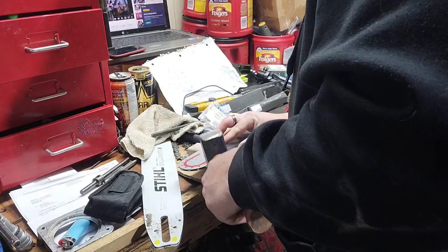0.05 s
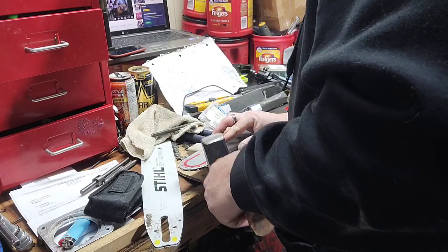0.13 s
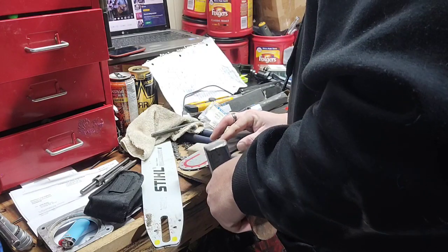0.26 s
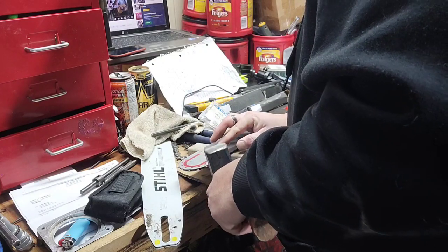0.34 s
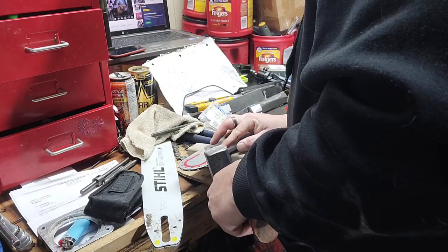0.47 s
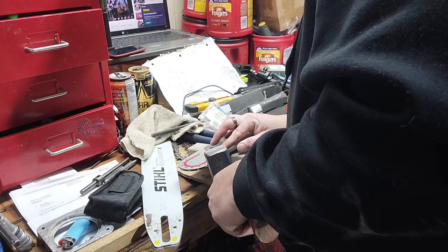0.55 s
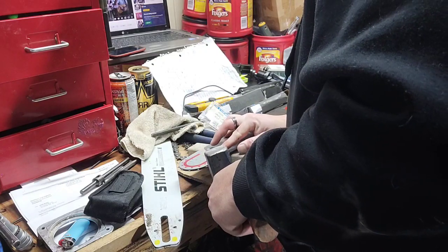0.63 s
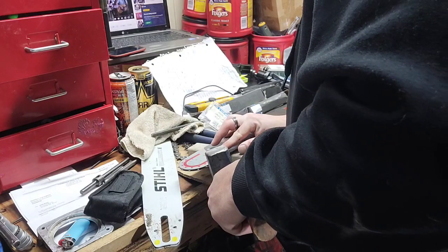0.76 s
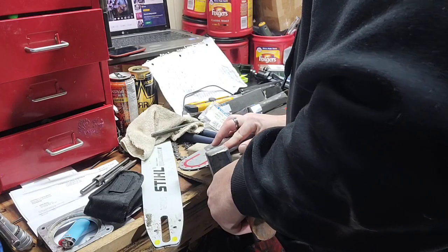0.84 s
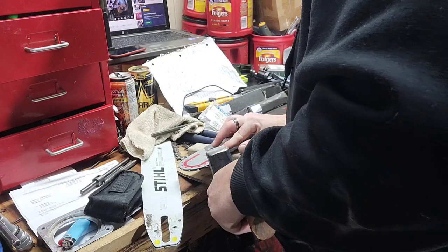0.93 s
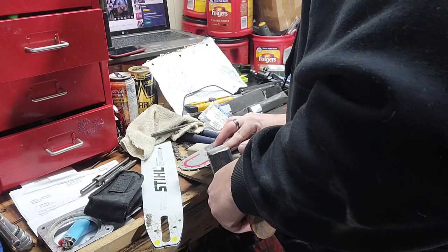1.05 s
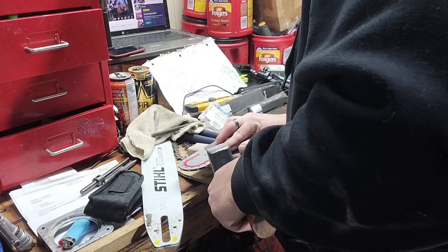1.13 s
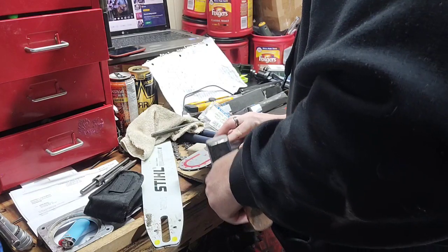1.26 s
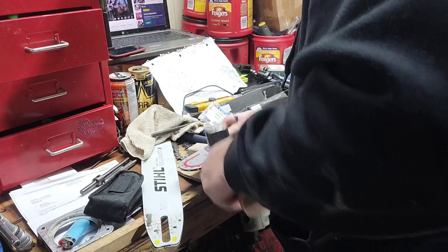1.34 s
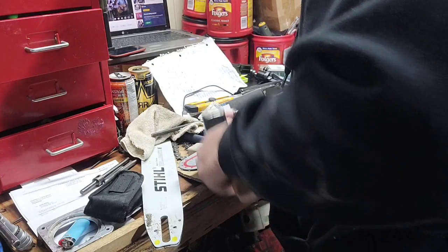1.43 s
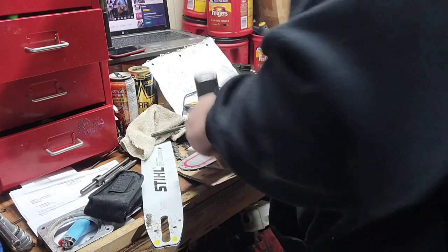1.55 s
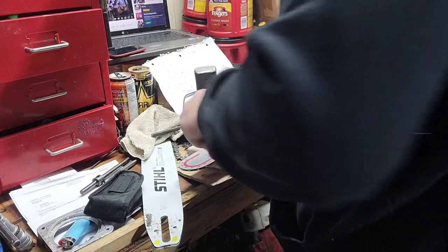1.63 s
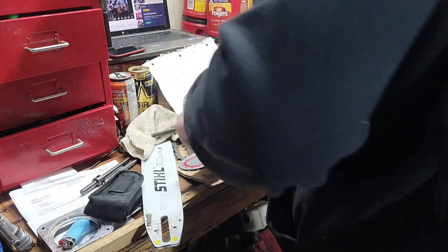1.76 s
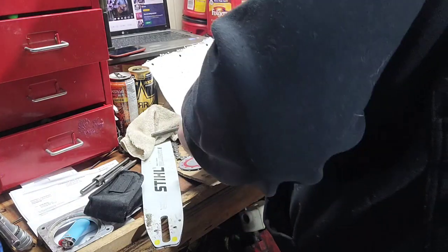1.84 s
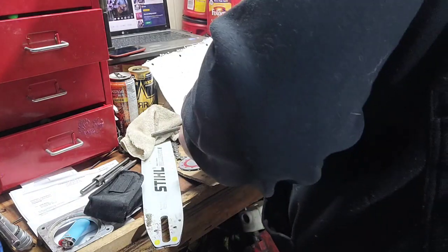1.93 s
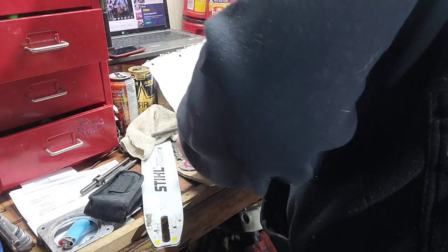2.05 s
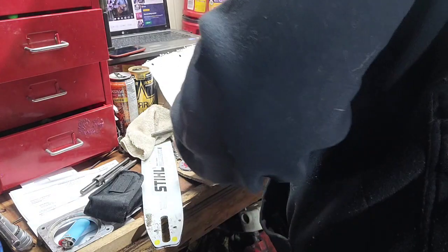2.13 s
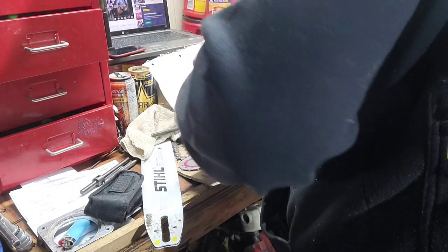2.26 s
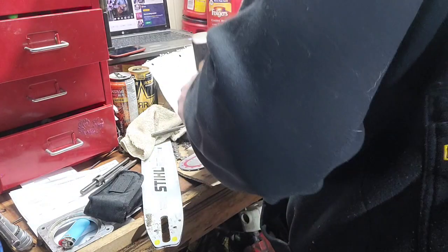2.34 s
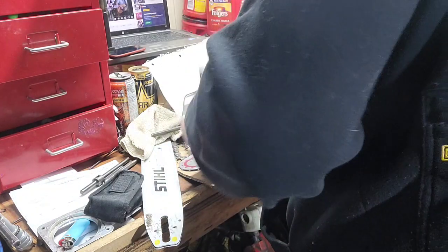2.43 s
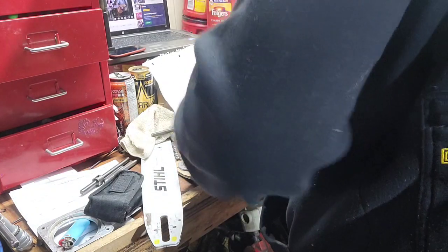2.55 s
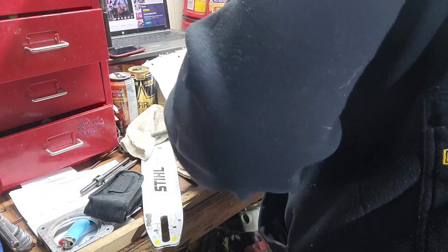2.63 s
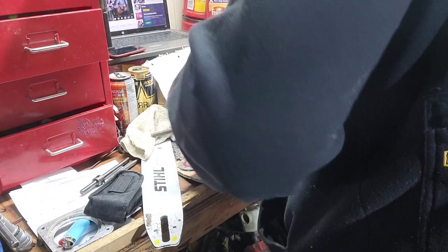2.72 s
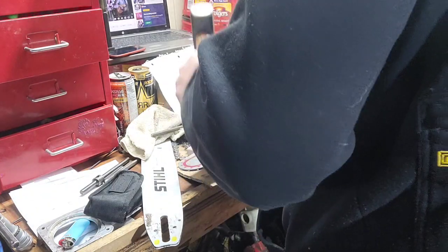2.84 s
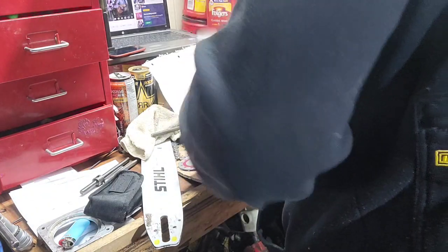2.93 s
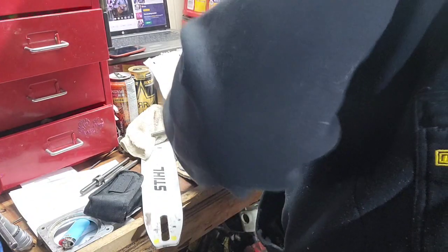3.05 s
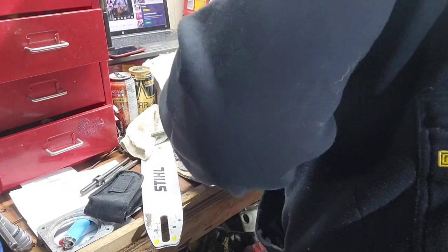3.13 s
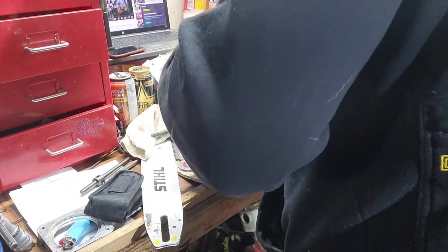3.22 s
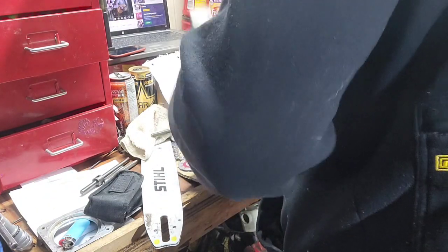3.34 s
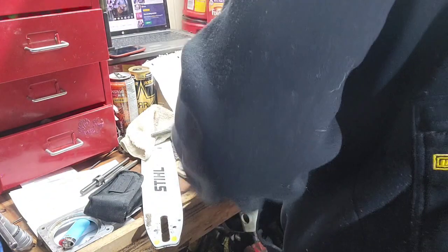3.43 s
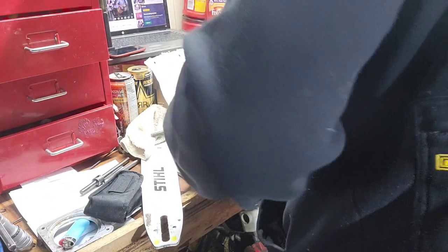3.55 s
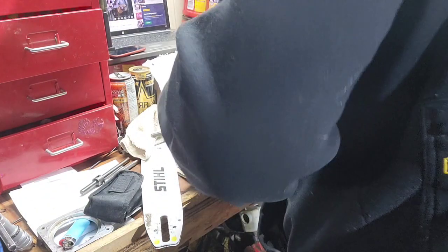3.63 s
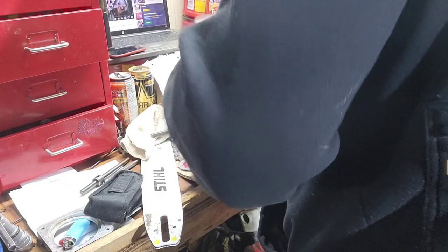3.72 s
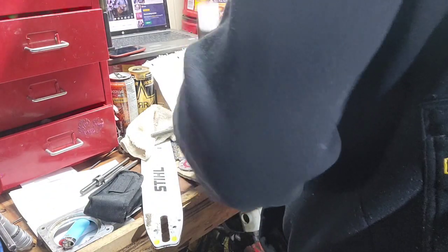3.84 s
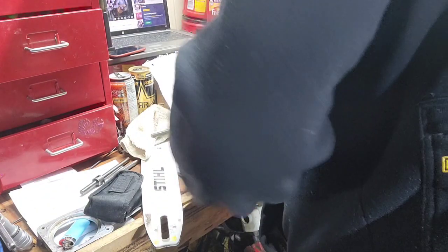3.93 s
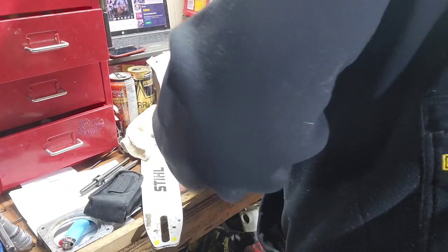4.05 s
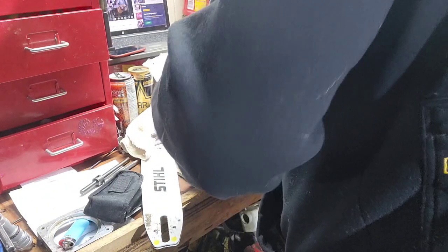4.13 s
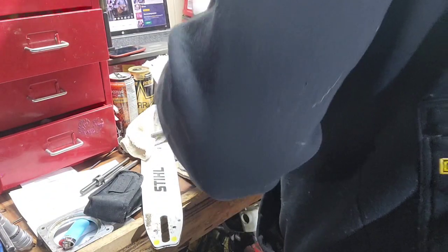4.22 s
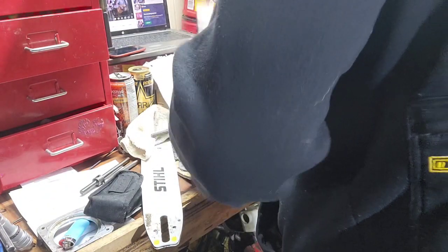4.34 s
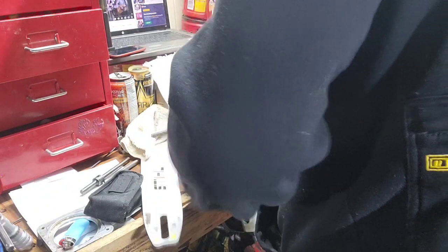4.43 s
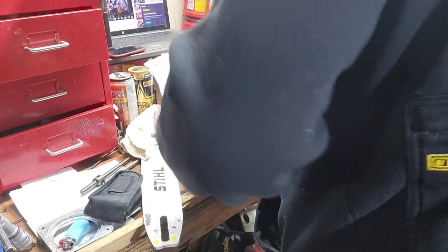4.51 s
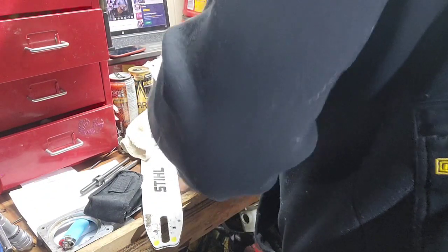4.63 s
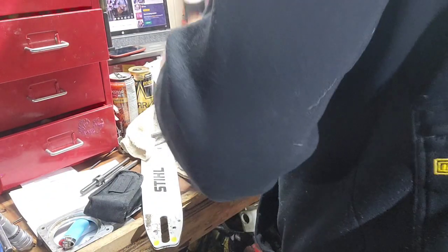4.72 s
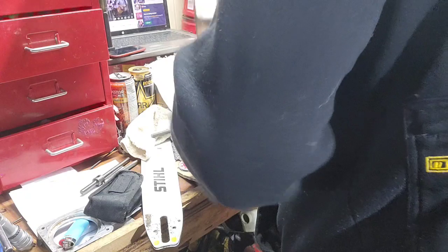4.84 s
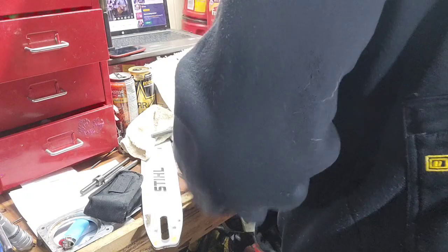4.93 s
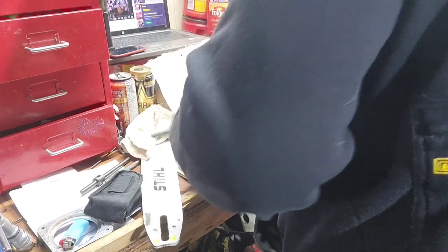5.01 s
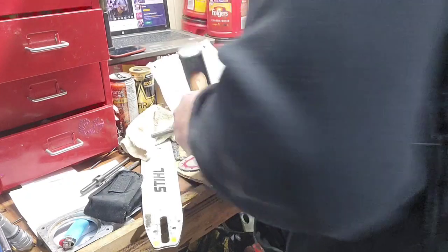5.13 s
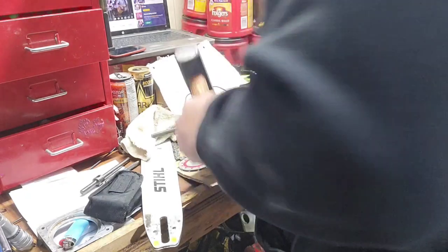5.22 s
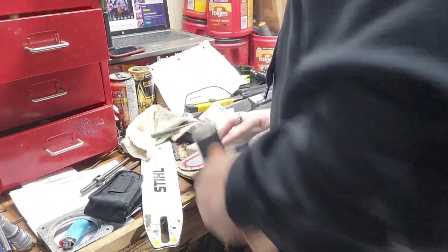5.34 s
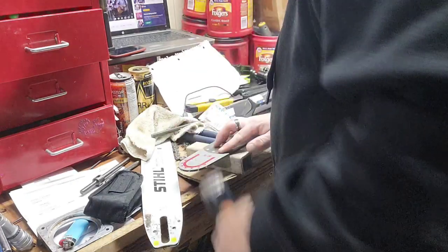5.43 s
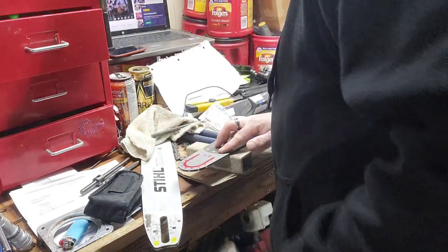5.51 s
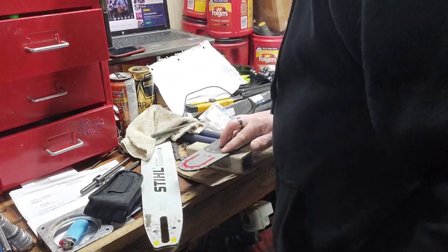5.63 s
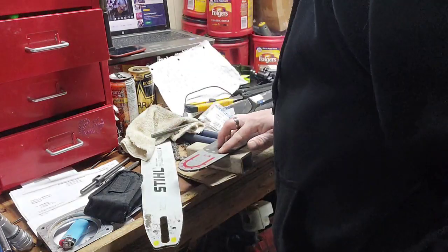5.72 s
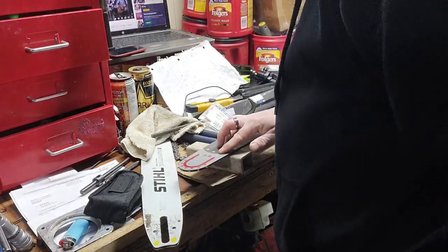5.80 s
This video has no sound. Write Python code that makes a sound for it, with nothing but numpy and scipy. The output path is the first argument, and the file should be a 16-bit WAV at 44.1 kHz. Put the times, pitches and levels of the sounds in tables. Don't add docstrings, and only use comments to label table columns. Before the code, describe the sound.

In a quiet shop with a faint fan hum, six hard hammer blows clang on steel, thumping a cluttered wooden bench and rattling loose parts.

```python
import sys
import numpy as np
from scipy import signal
from scipy.fft import rfft, irfft, next_fast_len
from scipy.io import wavfile
from scipy.ndimage import uniform_filter1d, map_coordinates

SR = 44100
rng = np.random.default_rng(int(sys.argv[2]) if len(sys.argv) > 2 else 0)


def linear_from_db(decibels):
    return 10 ** (np.asarray(decibels, float) / 20)


def generate_wav(sig):
    pcm = np.round(np.clip(np.atleast_2d(sig).T, -1, 1) * 32767).astype(np.int16)
    wavfile.write(sys.argv[1], SR, pcm)


N = 258862

# start in seconds, peak in dB, steel mode favoured by the spot struck in Hz,
# hammer head ring in dB, extra treble duck of the left port in dB.
BLOWS = [
    (2.5525, -7, 6530, -17, -2),
    (3.045, -5.5, 3930, -19.5, 30),
    (3.518, -7, 4560, 2, 3),
    (4.006, -6, 4720, -10, 26.5),
    (4.493, -5.5, 3740, -7.5, 22),
    (5.008, -4, 5100, 1.5, 16),
]


def unit(x):
    return x / np.sqrt(np.mean(x ** 2) + 1e-20)


def along(points, hz):
    f, v = np.transpose(points)
    return np.interp(np.log(hz + 1), np.log(f + 1), v)


def humps(peaks, hz):
    return sum(linear_from_db(db) * np.exp(-2 * ((hz - c) / w) ** 2) for c, w, db in peaks)


def wobble(knots_per_s):
    knots = rng.standard_normal(int(N * knots_per_s / SR) + 4)
    return map_coordinates(knots, [np.arange(N) * knots_per_s / SR])


def filtered(x, response):
    m = next_fast_len(N + SR // 2)
    return irfft(rfft(x, m) * response(np.fft.rfftfreq(m, 1 / SR)), m)[..., :N]


def dying(spectrum, t60s, patchy_db):
    hz, t, z = signal.stft(rng.standard_normal((2, SR // 2)), SR, nperseg=256)
    unevenness = uniform_filter1d(rng.standard_normal(z.shape[1:]), size=12, axis=1)
    patches = linear_from_db(patchy_db * unit(unevenness))
    colour = unit(linear_from_db(along(spectrum, hz)))[:, None]
    decay = linear_from_db(-60 * t / along(t60s, hz)[:, None])
    return signal.istft(z * colour * patches * decay, SR, nperseg=256)[1][:, :SR // 2]


def ringing(modes, scatter_db, rough):
    t = np.arange(SR // 2) / SR
    out = np.zeros((2, len(t)))
    for hz, db, t60_s in modes:
        level = linear_from_db(db + scatter_db * rng.standard_normal() - 60 * t / t60_s)
        drift = rough * np.cumsum(rng.standard_normal(len(t))) / np.sqrt(SR)
        phase = 2 * np.pi * (hz * t + rng.random()) + drift
        out += level * np.sin(phase + [[0], [np.pi / 2]])
    return out


def add(track, sound, s):
    start = round(s * SR)
    track[:, start:start + sound.shape[-1]] += sound


def ports(pair, alike, left):
    def mix(hz, sign):
        turn = np.arccos(np.clip(along(alike, hz), -1, 1)) / 2
        return linear_from_db(sign * along(left, hz) / 2) * np.array([np.cos(turn), sign * np.sin(turn)])
    return np.array([filtered(pair, lambda hz: mix(hz, sign)).sum(axis=0) for sign in (1, -1)])


def blows():
    # Hz, density in dB per Hz; then Hz, t60 in seconds.
    clang_spectrum = [(110, -27.5), (220, 0.5), (566, -6.5), (790, -4), (888, -3), (979, -14), (1390, -6.5),
                      (2870, -9.5), (3350, -8), (6140, -16.5), (8070, -13), (8730, -22.5), (16000, -15.5)]
    clang_t60 = [(200, 0.15), (700, 0.1), (1500, 0.11), (4000, 0.12), (12000, 0.1)]
    # Hz, level in dB.
    steel_modes = [(3292, -4), (3450, -2), (3822, -7), (4145, -6), (4470, -3), (5145, -6.5), (5590, -10),
                   (6485, -1.5), (7985, -3.5), (8910, -14), (9310, -16.5), (10170, -16), (11660, -7.5)]
    plate_modes = [(1234, -0.5), (1384, -1), (1969, -1.5), (2322, -5.5)]
    # Hz, level in dB, t60 in seconds, share of the blow's ring dB.
    head_modes = [(1090, -45, .4, .6), (7867, -53, .4, .3), (9755, -51, .4, -.2), (14190, -38, .4, 1)]
    # Hz, level in dB, t60 in seconds.
    board_modes = [(305, 0, 0.36), (390, -12.5, 0.083), (442.3, -15, 0.083), (546, 4.5, .25),
                   (606.7, 0.5, 0.32), (684, -2.5, 0.22), (887.6, -0.5, 0.26)]
    # Hz, density in dB per Hz; then Hz, t60 in seconds.
    echo_spectrum = [(40, -24.5), (75, -16), (190, -26.5), (340, -4.5), (750, -11), (1240, -13.5),
                     (2770, -27.5), (8000, -36.5), (8800, -42.5), (15500, -41)]
    echo_t60 = [(60, .4), (500, .33), (2500, .3), (12000, .3)]
    hop_s, flight_s, free_db = 0.024, 0.038, 11.5
    spot_db_per_octave, steel_t60_s = 10, 0.12
    shop_grows = 0.87

    out, t = np.zeros((2, N + SR)), np.arange(SR // 2) / SR
    airborne = np.exp(-(np.abs(t - hop_s - flight_s / 2) / (flight_s / 2)) ** 4)
    chatter = linear_from_db(1 * wobble(knots_per_s=120))
    for s, db, spot_hz, ring_db, _ in BLOWS:
        clang = linear_from_db(18.5) * dying(clang_spectrum, clang_t60, patchy_db=3.5)
        struck = [(hz, level - spot_db_per_octave * abs(np.log2(hz / spot_hz)), steel_t60_s)
                  for hz, level in steel_modes]
        block = linear_from_db(5 + free_db * airborne) * ringing(struck, scatter_db=3.5, rough=12)
        plate = [(hz, level, 0.11) for hz, level in plate_modes]
        base = linear_from_db(7.5) * ringing(plate, scatter_db=1.5, rough=15)
        wood = linear_from_db(-6.5) * ringing(board_modes, scatter_db=0.5, rough=14)
        shop = linear_from_db(-4 + shop_grows * (db + 5.5)) * dying(echo_spectrum, echo_t60, patchy_db=2.5)
        shop *= 1 - np.exp(-t / 0.046)
        rung = [(hz, level + share * ring_db, t60_s) for hz, level, t60_s, share in head_modes]
        head = ringing(rung, scatter_db=0, rough=1.5)
        steel = (clang + block + base + shop) * chatter[round(s * SR):][:len(t)]
        onset = 1 - np.exp(-t / 0.0006)
        add(out, (linear_from_db(db) * (steel + wood) + head) * onset, s)
    return out[:, :N]


def thump():
    t = np.arange(SR // 2) / SR
    return np.sin(2 * np.pi * 72 * t + 3.3) * linear_from_db(-60 * t / 0.082) * (1 - np.exp(-t / 0.008)) ** 2


def shaking():
    # Hz, density in dB per Hz.
    knock_spectrum = [(120, -23.5), (250, 2.5), (500, -9.5), (1000, -5.5), (2000, -20), (4000, -41)]
    # start in seconds, level in dB.
    nudges = [
        (2.076, -20),
        (2.121, -24),
    ]

    out = np.zeros((2, N + SR))
    for s, db, *_ in BLOWS:
        knock = linear_from_db(14.5) * dying(knock_spectrum, [(250, 0.069), (1500, 0.011)], patchy_db=-5.5)
        knock = knock * linear_from_db([[-14], [0]])
        sway = linear_from_db(25.5) * thump() * linear_from_db([[-7], [0]])
        add(out, linear_from_db(db) * (knock + sway), s)
    for s, db in nudges:
        add(out, linear_from_db(db) * thump() * linear_from_db([[-13], [0]]), s)
    return out[:, :N]


def landings():
    # start in seconds, peak in dB, note in Hz.
    hopped = [(2.664, -5.5, 694), (2.702, -28, 620), (2.792, -28, 427), (3.132, -6.5, 319),
              (3.208, -31, 332), (3.406, -48, 449), (3.563, -13.5, 443), (3.617, -11, 522),
              (3.646, -11, 338), (3.689, -28.5, 342), (3.82, -41, 436), (3.844, -48, 350), (4.109, -6, 527),
              (4.165, -19, 545), (4.19, -23, 317), (4.26, -38, 390), (4.355, -47, 462.6),
              (4.581, -9.5, 290), (4.629, -16.5, 318), (4.666, -18.5, 349), (4.829, -42, 284),
              (5.116, -12, 560), (5.184, -22, 511), (5.193, -20, 609), (5.225, -37, 560), (5.302, -44, 267),
              (5.401, -57, 500)]
    # start in seconds, peak in dB, note in Hz.
    settings = [
        (2.071, -30.5, 302),
        (2.097, -29, 318),
        (2.122, -28.5, 304),
        (5.785, -51.5, 610),
    ]
    # Hz, density in dB per Hz.
    thud_spectrum = [(150, -21.5), (250, 6), (350, 11.5), (600, 0.5), (1350, -8.5), (1800, -22.5),
                     (5000, -47)]
    edge_spectrum = [(800, -26.5), (2000, 0.5), (4500, -1.5), (9000, -7.5), (15500, -7.5)]

    out, t = np.zeros((2, N + SR)), np.arange(SR // 2) / SR
    drops = [(s, db, hz, 0.17 * (hz / 350) ** -0.98, -39.5) for s, db, hz in hopped]
    drops += [(s, db, hz, 0.26, -16.5) for s, db, hz in settings]
    for s, db, hz, t60_s, edge_db in drops:
        body = [(f * (hz / 350) ** 0.6, level) for f, level in thud_spectrum]
        thud = dying(body, [(300, t60_s), (1500, 0.6 * t60_s)], patchy_db=3)
        note = ringing([(hz, -3, 0.7 * t60_s)], scatter_db=0, rough=10)
        edge_t60 = [(2000, 0.96 * t60_s), (12000, 0.43 * t60_s)]
        edge = linear_from_db(edge_db) * dying(edge_spectrum, edge_t60, patchy_db=4.5)
        dull = (thud + note) * (1 - np.exp(-t / 0.002))
        bright = edge * (1 - np.exp(-t / (0.024 * t60_s)))
        add(out, linear_from_db(db - 8.5) * (dull + bright), s)
    return out[:, :N]


def tinks():
    # start in seconds, level in dB, mode in Hz, t60 in seconds.
    touches = [(2.066, -52, 11000, 0.071), (2.631, -42, 4790, 0.11), (3.745, -52, 1110, 0.24),
               (4.19, -68.5, 8000, .3), (5.192, -61.5, 7867, 0.42), (5.197, -52, 7160, 0.084),
               (5.295, -52.5, 1100, 0.22), (5.63, -78, 4750, .15), (5.779, -82, 10870, .2),
               (5.79, -68, 7050, 0.14), (5.78, -75, 9700, 0.22), (5.78, -77, 4750, 0.17)]

    out = np.zeros((2, N + SR))
    for s, db, hz, t60_s in touches:
        add(out, ringing([(hz, db, t60_s)], scatter_db=-1, rough=3.6), s)
    return out[:, :N]


def rattles():
    # start in seconds, peak in dB.
    clicks = [(2.7023, -49.5), (2.7343, -95), (2.8524, -54.5), (2.8794, -55), (3.137, -26), (3.1672, -38),
              (3.2041, -43.5), (3.236, -56.5), (3.562, -13), (3.6444, -47.5), (3.6698, -48), (3.6917, -41),
              (4.1496, -37.5), (4.1898, -50), (4.215, -56), (4.243, -52), (4.5994, -37.5), (4.6589, -44.5),
              (4.6775, -42), (5.1922, -39), (5.227, -49.5), (5.2545, -58)]
    # start in seconds, level in dB, t60 in seconds.
    rustles = [
        (2.069, -55, 0.25),
        (2.118, -50.5, 0.2),
        (5.62, -63.5, 0.28),
        (5.782, -66.5, 0.33),
    ]
    # Hz, density in dB per Hz.
    click_spectrum = [(1500, -21), (3500, -3.5), (6500, -3), (8200, -3), (10000, -14.5), (15500, -18)]
    cloth_spectrum = [(500, 2), (1200, 4), (4800, -19), (6000, -25), (11000, -19), (15500, -17.5)]

    out, t = np.zeros((2, N + SR)), np.arange(SR // 2) / SR
    for s, db in clicks:
        click = dying(click_spectrum, [(2000, 0.029), (12000, 0.023)], patchy_db=3.5)
        add(out, linear_from_db(db - 10.5) * click, s)
    for s, db, t60_s in rustles:
        rub = dying(cloth_spectrum, [(1000, t60_s)], patchy_db=6.0)
        add(out, linear_from_db(db) * rub * (1 - np.exp(-t / 0.0079)), s)
    return out[:, :N]


def fan():
    # time in seconds, level in dB.
    strength = [(0, 0), (.6, -0.5), (1.2, -0.5), (2.0, 1), (2.5, -2), (4.4, -4), (5.0, -5), (5.42, -6),
                (5.52, -10.5), (5.87, -9)]
    # Hz, density in dB per Hz.
    air_spectrum = [(110, -42.5), (180, -5), (205, -7), (314, -1.5), (348, -8), (392, -2.5), (481, -5.5),
                    (533, -7), (828, -11), (891, -9.5), (1600, -22.5), (3100, -32), (6000, -43),
                    (7800, -70.5), (13200, -120)]
    # Hz, width in Hz, level in dB.
    duct_peaks = [(307, 71, -7.5), (390, 15, 0.5), (560, 54, 9.5), (690, 81, 0.5), (1105, 50, 1),
                  (1449, 65, 6.5), (2970, 1500, -2.5)]
    hum_peaks = [(66.3, 37, 3), (142.7, 26, 4.5), (104, 51, -12), (40, 31, -15.5)]
    hiss_peaks = [(4700, 1300, -4), (7050, 910, -2), (9440, 680, -0.5), (11800, 500, 0), (12840, 470, 2),
                  (14700, 780, 0)]

    def noise(response):
        return unit(filtered(rng.standard_normal((2, N)), response))

    t = np.arange(N) / SR
    strength_db = np.interp(t, *np.transpose(strength))
    air_db = -58 + strength_db + 0.77 * wobble(5.4)
    hum_db = -59.5 + 1.3 * strength_db + 1.5 * wobble(1.5)
    sunk_db = 1.5 * sum(t > s for s, *_ in BLOWS)
    hiss_db = -75 + 0.58 * strength_db - sunk_db
    air = noise(lambda hz: linear_from_db(along(air_spectrum, hz)) * (1 + humps(duct_peaks, hz) / 2))
    hum = noise(lambda hz: humps(hum_peaks, hz))
    flutter = noise(lambda hz: humps(hiss_peaks, hz)) * linear_from_db(5 * np.tanh(1.5 * wobble(40)))
    hiss = unit(unit(flutter) + linear_from_db(-4) * noise(lambda hz: 1.0 * (hz > 3000)))
    return linear_from_db(air_db) * air + linear_from_db(hum_db) * hum + linear_from_db(hiss_db) * hiss


def scene():
    # Hz, likeness from -1 to 1.
    near_alike = [(60, .9), (300, .85), (650, .7), (1400, .35), (3000, .15), (15000, .05)]
    far_alike = [(60, 0.5), (180, 1), (550, 0.26), (1650, -1), (4970, 0.5), (15000, -0.5)]
    # Hz, level in dB.
    near_left = [(60, -6), (150, -4), (330, 6), (700, 9.5), (2400, 10), (15000, 10)]
    far_left = [(60, -11.5), (150, -7), (380, 8), (950, 13.5), (2380, 21), (5980, 19.5), (15000, 10.5)]

    near = ports(blows() + landings() + tinks() + rattles(), near_alike, near_left)
    return near + shaking() + ports(fan(), far_alike, far_left)


def band_limit(x):
    return signal.sosfilt(signal.butter(12, 16790, fs=SR, output="sos"), x)


def record(dry):
    # Hz, width in Hz, depth in dB.
    dips = [(180, 49, -7), (8340, 120, -5)]
    top_hz, low_cut_hz = 15600, 45
    left_treble_s, left_bass_db, left_bass_s = 0.033, 27.5, 0.028

    t = np.arange(N) / SR
    duck_db, bass_db, treble_db = np.zeros((3, 2, N))
    for s, *_, left_db in BLOWS:
        since = np.where(t > s - 0.005, t - s, 9)
        duck_db -= [[28], [21]] * np.clip(1 - since / [[0.065], [0.06]], 0, 1)
        treble_db[0] -= left_db * np.clip(1 - since / left_treble_s, 0, 1) ** 1.7
        bass_db[0] -= left_bass_db * np.clip(1 - since / left_bass_s, 0, 1) ** 3.7

    def gain(db):
        return linear_from_db(uniform_filter1d(db, size=150, axis=1))

    def microphone(hz):
        edge = linear_from_db(-30 / (1 + np.exp((top_hz - hz) / 60)))
        notches = linear_from_db(sum(db * np.exp(-2 * ((hz - c) / w) ** 2) for c, w, db in dips))
        ratio = low_cut_hz / (hz + 1)
        low_cut = 1 / (1 - np.sqrt(2) * 1j * ratio - ratio ** 2) ** 2
        return edge * notches * low_cut

    bass = filtered(dry, lambda hz: 1 / (1 + (hz / 1600) ** 4))
    x = ((dry - bass) * gain(treble_db) + bass * gain(bass_db)) * gain(duck_db)
    x = x / (1 + np.abs(x / 0.95) ** 4) ** (1 / 4)
    return band_limit(filtered(x, microphone))


dry = scene()
out = record(dry)
generate_wav(out)
```